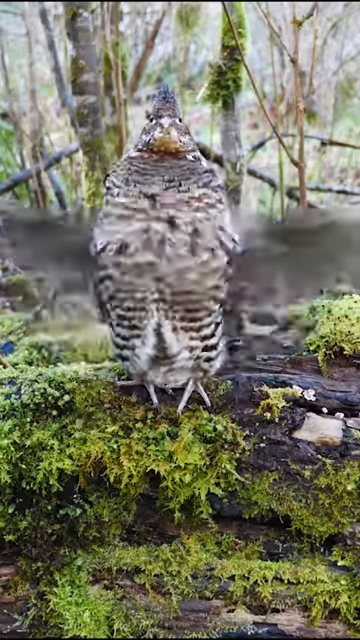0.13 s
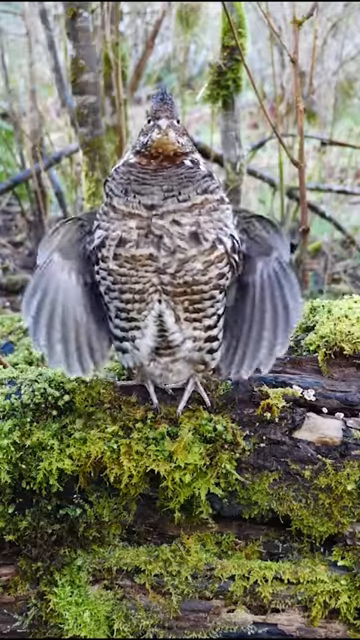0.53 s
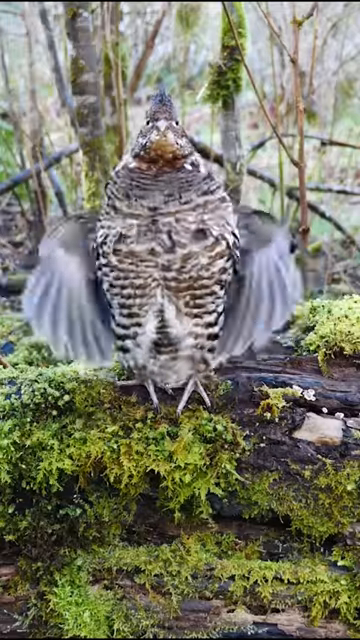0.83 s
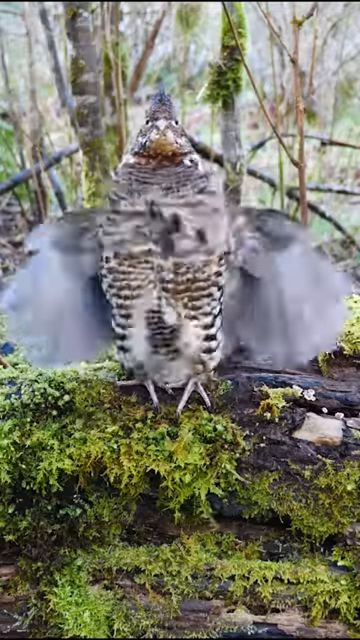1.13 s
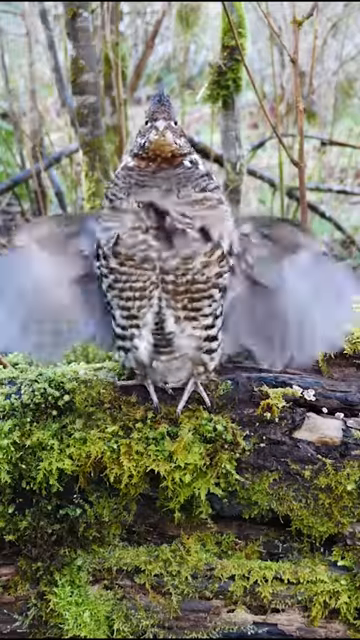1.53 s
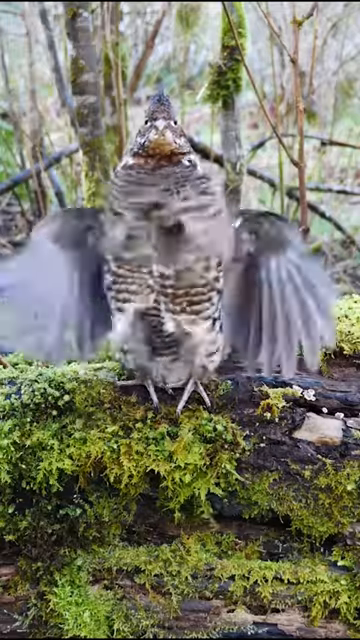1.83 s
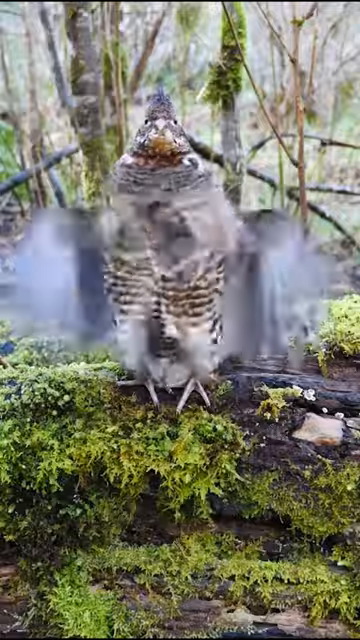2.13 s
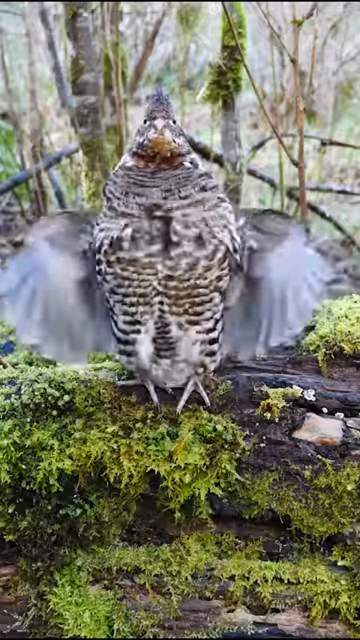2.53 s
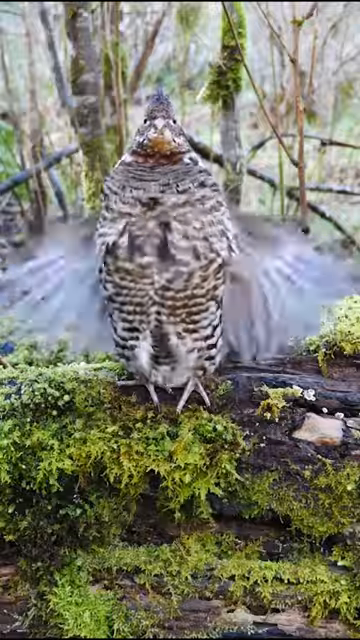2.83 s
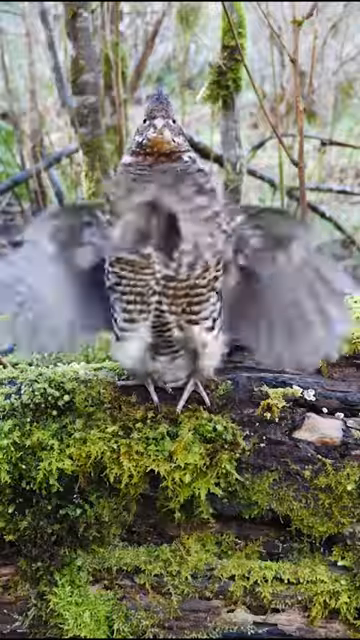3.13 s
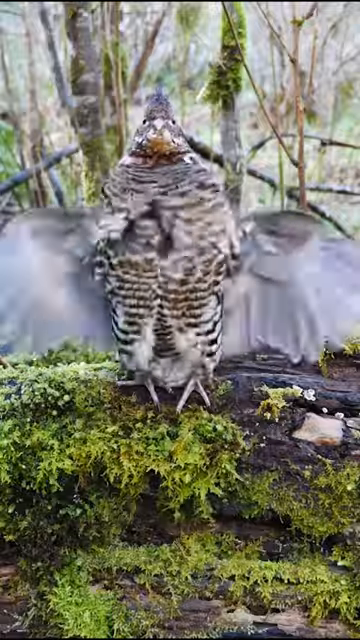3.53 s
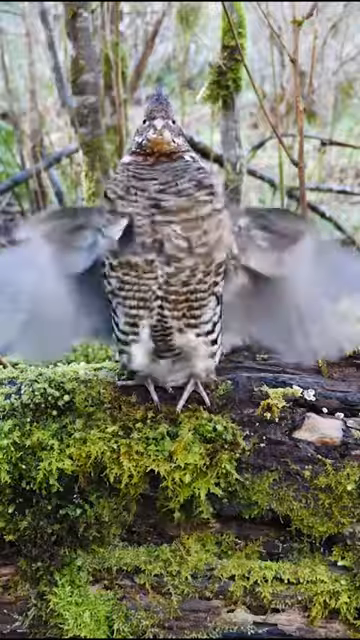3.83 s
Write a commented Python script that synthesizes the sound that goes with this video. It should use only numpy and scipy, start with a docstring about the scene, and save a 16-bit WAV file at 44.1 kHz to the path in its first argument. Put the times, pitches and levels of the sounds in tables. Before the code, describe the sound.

Deep, soft-edged wing thumps from a drumming grouse speed up close by, with distant birdsong echoing behind.

```python
"""Grouse drumming in a quiet wood

A ruffed grouse drums on a mossy log, close to the microphone: ever faster wingbeats, each a deep pulse
of air made of smooth shoves, with a brush of coloured noise for the feathers. The pulses overload, most on
the left, where low noise buffets as a draught. Two songbirds, one twittering and one whistling, are
gliding tones that echo through the wood, over a steady bed of air noise."""
import sys
import numpy as np
from scipy import signal
from scipy.fft import rfft, irfft, next_fast_len
from scipy.io import wavfile
from scipy.ndimage import map_coordinates

SR = 44100
rng = np.random.default_rng(int(sys.argv[2]) if len(sys.argv) > 2 else 0)


def int16_out(signal):
    """Quantize to a 16-bit WAV file."""
    q = np.round(np.clip(np.atleast_2d(signal).T, -1, 1) * 32767)
    wavfile.write(sys.argv[1], SR, q.astype(np.int16))


N = 176400

# The wingbeats, closing up as the drumming quickens.
# Each row: main push in seconds, relative strength in dB, relative feather level in dB.
WINGBEATS = [(.263, -0.6, 1.5), (.7616, -0.06, 3), (1.1901, 0.5, 3.5), (1.5716, 0.5, 3), (1.9157, 0.5, 3),
             (2.2258, 0.26, 4), (2.5073, 0.86, 5.5), (2.7625, 0.5, 3.5), (2.9948, 0.9, 4.5),
             (3.2033, 1, 4.5), (3.396, 0.36, 5), (3.5734, 1, 5.5), (3.7394, 0.4, 5), (3.892, 0.8, 6)]


def amp(db):
    return 10 ** (np.asarray(db) / 20)


def unit(x):
    return x / np.sqrt(np.mean(x ** 2) + 1e-20)


def along(points, hz):
    """(Hz, value) points on a log axis."""
    f, v = np.transpose(points)
    return np.interp(np.log(hz + 1), np.log(f + 1), v)


def filtered(x, response):
    """x times a response of frequency."""
    size = next_fast_len(N + SR // 2)
    return irfft(rfft(x, size) * response(np.fft.rfftfreq(size, 1 / SR)), size)[..., :N]


def noise(spectrum, side):
    """Coloured stereo noise of rms 1; side sets its width."""
    m, s = filtered(rng.standard_normal((2, N)), lambda hz: amp(along(spectrum, hz)))
    return unit(np.array([m + side * s, m - side * s]))


def pan(left_db):
    """Gains of the two channels."""
    return amp([[left_db / 2], [-left_db / 2]])


def air():
    """The quiet wood's background: steady, mostly low noise."""
    # Colour of the air. Each row: frequency in Hz, relative level in dB.
    air_colour = [(35, -30), (60, 1.5), (100, -3.5), (278, -16.5), (359, -14.5), (910, -16.5),
                  (1910, -27.5), (3270, -22.5), (4220, -27), (5980, -43.5), (10900, -44), (13800, -68),
                  (15500, -69)]
    return amp(-53) * noise(air_colour, side=0.75) * pan(left_db=0.5)


def draught(right_db=-22):
    """Stirred air builds up as the beats quicken and buffets the left channel."""
    # Strength of the draught. Each row: time in seconds, level in dB.
    gusts = [(0, -47), (1.199, -35.5), (2, -33.5), (2.8, -23), (3.499, -26), (3.75, -15), (4, -18.5)]
    # Colour of the buffeting. Each row: frequency in Hz, relative level in dB.
    buffet_colour = [(5, -2), (14, -3), (30, -14), (60, -28.5), (120, -33.5), (250, -50), (600, -78.5),
                     (2000, -120)]
    level_db = np.interp(np.arange(N) / SR, *np.transpose(gusts))
    return amp(level_db) * noise(buffet_colour, side=0.83) * amp([[0], [right_db]])


def song(notes, arch, waver, waver_hz, overtone_db, flutter_db=3, flutter_hz=130):
    """Gliding tones that bow up or down in the middle and waver in pitch and level."""
    out = np.zeros(N + SR)
    for start, length, start_hz, end_hz, db in notes:
        u = np.linspace(0, 1, int(length * SR))  # progress through the note
        shake = map_coordinates(rng.standard_normal(256), [u * length * waver_hz], mode="mirror")
        glide = start_hz + (end_hz - start_hz) * u
        bow = arch * (np.sin(np.pi * u) - .5)
        hz = glide * (1 + bow + waver * shake)
        flutter = flutter_db * map_coordinates(rng.standard_normal(64), [u * length * flutter_hz], mode="mirror")
        phase = 2 * np.pi * np.cumsum(hz) / SR
        tone = np.sin(phase) + amp(overtone_db) * np.sin(2 * phase)
        swell = np.abs(np.sin(np.pi * u)) ** 0.23  # quick rise, long top, quick fall
        out[max(0, round(start * SR)):][:len(u)] += amp(db + flutter) * swell * tone
    return out[:N]


def flurries():
    """Harsh flurries in the twitterer's calls: tiny upward chips at scattered pitches, over a rasping hiss."""
    # The flurries. Each row: start in seconds, length in seconds, pitch in Hz, relative level in dB.
    bursts = [(0, 0.045, 3780, -56.5), (0.407, .06, 4914, -60.5), (0.76, .06, 4680, -56.5),
              (1.31, 0.13, 4730, -56), (1.627, .08, 4760, -58), (1.989, 0.065, 4970, -64.5),
              (2.355, 0.2, 5290, -60.5), (2.511, .12, 5030, -74), (3.27, 0.15, 5010, -58),
              (3.876, 0.075, 5140, -65)]
    # Colour of the hiss. Each row: frequency in Hz, relative level in dB.
    rasp_colour = [(1500, -31), (3000, 13), (5000, -8.5), (7000, -10.5), (10000, -10.5), (13000, -16),
                   (16000, -24)]
    chips_per_s, chip_s = 170, 0.0084
    pitch_scatter, pitch_rise = 0.2, 0.2065  # shares of the pitch
    t = np.arange(N) / SR
    chips, swell = [], np.zeros(N)
    for start, length, hz, db in bursts:
        chip_starts = np.arange(start, start + length, 1 / chips_per_s)
        for chip_start, (late, high, loud) in zip(chip_starts, rng.standard_normal((64, 3))):
            pitch = hz * np.exp(pitch_scatter * high)
            chip_db = db + 3 * loud - 7.4 * high  # higher chips tend to be softer
            chips.append((chip_start + 0.0015 * late, chip_s, pitch, pitch * (1 + pitch_rise), chip_db))
        swell += amp(db) * np.exp(-(2 * (t - start) / length - 1) ** 2)
    rasp = swell * noise(rasp_colour, side=0)[0]
    return song(chips, arch=0.034, waver=0.015, waver_hz=596, overtone_db=-21) + rasp


def woodland(x, direct_db, near_db, near_t60, far_db):
    """Direct sound, a quick scatter off nearby trunks and a long tail from the wood."""
    # Ring of the wood. Each row: frequency in Hz, time to fall by 60 dB in seconds.
    wood_t60 = [(200, 0.29), (2500, 1), (4000, 0.68), (7000, 0.25), (14000, 0.9)]
    hz, t, z = signal.stft(rng.standard_normal((2, SR)), SR, nperseg=256)
    decay = amp(-60 * t / along(wood_t60, hz)[:, None])
    far = signal.istft(z * decay, SR, nperseg=256)[1][:, :SR]
    near = rng.standard_normal((2, SR)) * amp(-60 * np.arange(SR) / SR / near_t60)
    far_echo = amp(far_db) * far / np.linalg.norm(far[0])
    near_echo = amp(near_db) * near / np.linalg.norm(near[0])
    return amp(direct_db) * x + signal.fftconvolve(x[None], far_echo + near_echo, axes=1)[:, :N]


def twittering_bird():
    """Short tones that arch upward in mid-glide, joined by flurries, to the right in the wood."""
    # Each row: start in seconds, length in seconds, start pitch in Hz, end pitch in Hz, relative level in dB.
    syllables = [(0, 0.024, 4400, 3446, -35), (.025, 0.035, 3910, 3120, -39.5),
                 (.44, 0.014, 4800, 4400, -55), (.47, 0.049, 3770, 2950, -56),
                 (.765, 0.022, 5550, 4760, -59), (.785, 0.025, 4890, 4130, -43),
                 (.825, 0.019, 3926, 3026, -40.5), (.85, 0.022, 3650, 3020, -44),
                 (.87, 0.02, 3720, 2926, -46), (1.33, .025, 4260, 4640, -56), (1.375, .04, 4990, 4110, -45),
                 (1.42, 0.025, 4300, 3670, -49), (1.452, .035, 3900, 2950, -47),
                 (1.638, 0.021, 5400, 4420, -52), (1.66, 0.02, 4100, 3184, -41),
                 (1.7, 0.026, 3730, 3000, -43.5), (1.737, 0.031, 3300, 2780, -47.5),
                 (2.0, 0.025, 4200, 5000, -52.5), (2.025, 0.023, 4100, 3850, -45.5),
                 (2.055, 0.018, 3730, 3240, -45.5), (2.357, 0.017, 5250, 6020, -59),
                 (2.378, 0.015, 4660, 4230, -46.5), (2.515, 0.05, 4510, 4060, -37.5),
                 (2.555, 0.04, 3800, 3360, -43), (2.615, 0.034, 4340, 4140, -40.5),
                 (2.657, 0.047, 3980, 3334, -43), (3.27, 0.041, 4710, 4810, -54.5),
                 (3.316, 0.024, 3670, 4360, -34.5), (3.345, 0.041, 3860, 3124, -39),
                 (3.403, .024, 3905, 4510, -38), (3.43, 0.036, 3500, 4000, -49),
                 (3.473, 0.038, 3490, 3020, -49), (3.895, 0.044, 4460, 4060, -46),
                 (3.935, 0.035, 3830, 3410, -48.5)]
    tones = song(syllables, arch=0.1693, waver=.028, waver_hz=700, overtone_db=-30.5, flutter_db=1)
    twitter = tones + flurries()
    return woodland(twitter, direct_db=-2, near_db=-1, near_t60=.25, far_db=-8.5) * pan(left_db=-6)


def push(t, width):
    """A shove of air: suction, then pressure."""
    u = t / width
    return u * np.exp((1 - u * u) / 2)


def wing_thumps():
    """Each stroke shoves the air: it winds up, strikes, follows through and swings slowly back."""
    # Shares are of the main push; widths are half-widths.
    push_s = .00418
    wind_up_share, wind_up_lead_s, wind_up_s = .116, .0086, .0053
    follow_share, follow_lag_s, follow_s = .261, .01015, .0036
    return_share, return_lag_s, return_s = 0.068, .026, 0.02
    t = np.arange(N) / SR
    thump = np.zeros(N)
    for beat_s, strength_db, _ in WINGBEATS:
        near = np.abs(t - beat_s) < .2
        d = t[near] - beat_s
        stroke = push(d, push_s)
        stroke += wind_up_share * push(d + wind_up_lead_s, wind_up_s)
        stroke += follow_share * push(d - follow_lag_s, follow_s)
        stroke -= return_share * push(d - return_lag_s, return_s)
        thump[near] += amp(strength_db) * stroke
    return thump * amp([[2.9], [-1.1]])  # left and right levels in dB


def feathers():
    """Feathers brush the air, with a short click of noise mid-push, where suction turns to pressure."""
    # Colour of the brush. Each row: frequency in Hz, relative level in dB.
    feather_colour = [(150, 3), (280, 0.5), (450, 1), (700, -5), (1200, -13), (1700, -16), (4000, -22),
                      (8000, -28.5), (12000, -29.5), (16000, -37)]
    rise_s, hold_s, fall_s = 0.0079, 0.0088, 0.023
    click_share, click_s = 0.81, .002  # share of the brush, decay to either side
    t = np.arange(N) / SR
    brush = np.zeros(N)
    for beat_s, _, feather_db in WINGBEATS:
        near = np.abs(t - beat_s) < .2
        d = t[near] - beat_s
        fade = np.maximum(-(d + hold_s) / rise_s, d / fall_s)  # below 0 during the hold
        sweep = np.exp(-np.maximum(fade, 0))
        click = click_share * np.exp(-np.abs(d) / click_s)
        brush[near] += amp(feather_db) * (sweep + click)
    return amp(-41.5) * brush * noise(feather_colour, side=1.0) * pan(left_db=1.0)


def whistling_bird():
    """Slurred tones that sag slightly in mid-glide, straight ahead and deeper in the wood."""
    # Each row: start in seconds, length in seconds, start pitch in Hz, end pitch in Hz, relative level in dB.
    slurs = [(.35, 0.019, 3200, 2700, -68), (.39, 0.064, 3050, 2950, -69), (.62, .05, 2450, 2720, -85),
             (1.03, 0.031, 3900, 4060, -66), (1.11, 0.074, 4400, 3310, -65),
             (1.205, 0.039, 3230, 2900, -63), (1.225, 0.044, 2610, 2360, -64),
             (1.275, 0.1, 3250, 2895, -64), (1.71, 0.044, 2300, 2080, -61), (1.79, 0.026, 3350, 2840, -59),
             (1.815, .025, 2930, 2460, -57.5), (1.842, 0.022, 2600, 2890, -59),
             (1.87, 0.046, 2647, 2030, -65), (1.935, 0.079, 2600, 2242, -60),
             (2.08, 0.28, 3080, 2960, -67.5), (2.2, 0.058, 3000, 3330, -54), (2.26, 0.088, 2600, 2363, -60),
             (2.37, 0.061, 3100, 2730, -57), (2.715, 0.066, 2100, 2694, -57.5),
             (2.785, 0.04, 2550, 3004, -58), (2.83, 0.058, 3405, 3140, -60.5),
             (2.847, 0.0385, 2850, 2350, -59), (2.89, 0.036, 2740, 2324, -63.5),
             (3.165, 0.091, 3550, 2677, -61), (3.24, 0.07, 3000, 2500, -62.5),
             (3.68, 0.046, 2500, 2360, -63)]
    whistle = song(slurs, arch=-0.045, waver=0.016, waver_hz=251.5, overtone_db=-26, flutter_db=2.5)
    return woodland(whistle, direct_db=5.5, near_db=2, near_t60=0.3, far_db=3.5)


def scene():
    """The grouse's wings and their draught, the two songbirds and the air of the wood."""
    grouse = wing_thumps() + feathers() + draught()
    return air() + grouse + twittering_bird() + whistling_bird()


def record(dry):
    """Overload flattens the tops of the thumps, pressure sooner than suction, and most on the left."""
    suction_top, pressure_tops, hardness = .95, [[.68], [.73]], 20  # pressure: left, right
    top = np.where(dry < 0, suction_top, pressure_tops)
    flattened = dry / (1 + np.abs(dry / top) ** hardness) ** (1 / hardness)
    return filtered(flattened, lambda hz: hz < 15800)  # nothing above this


dry = scene()
out = record(dry)
int16_out(out)
```